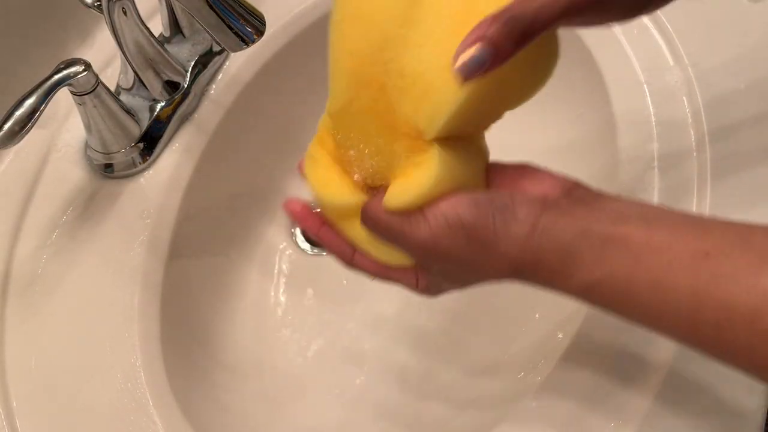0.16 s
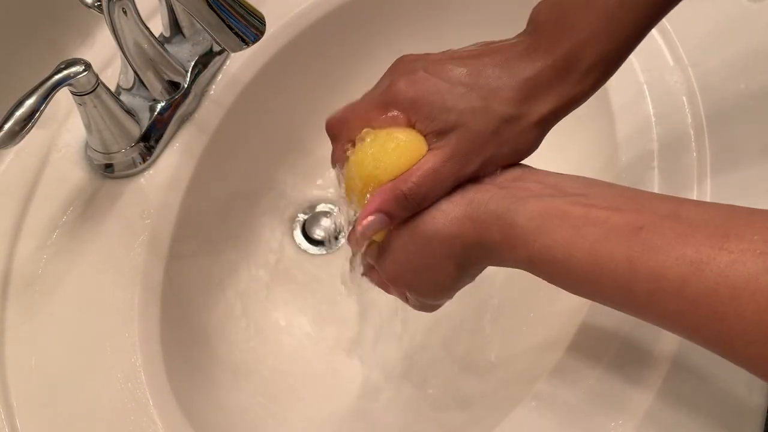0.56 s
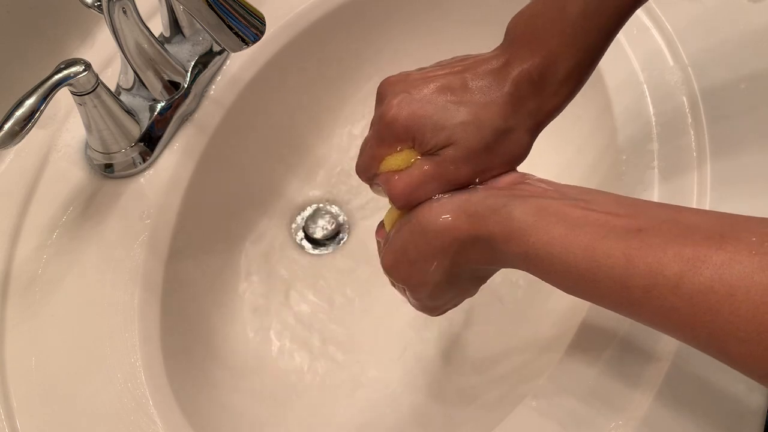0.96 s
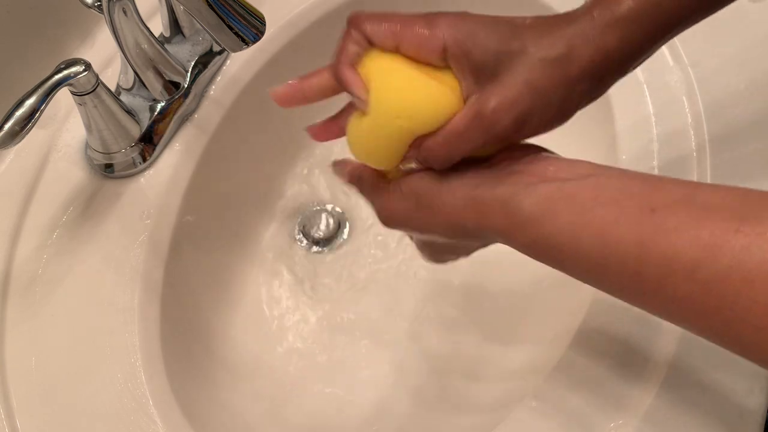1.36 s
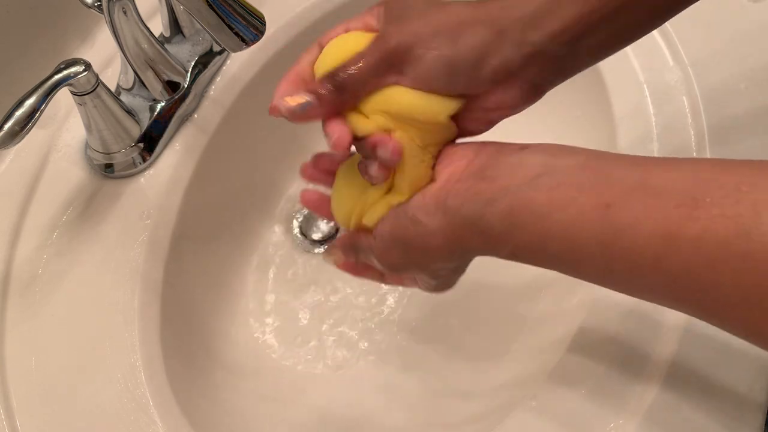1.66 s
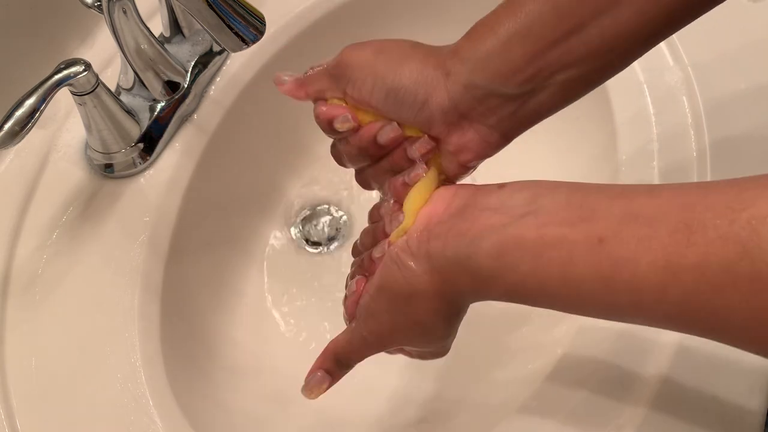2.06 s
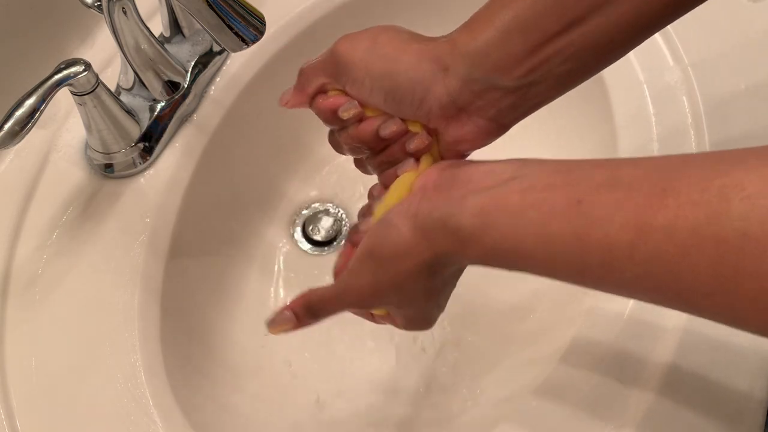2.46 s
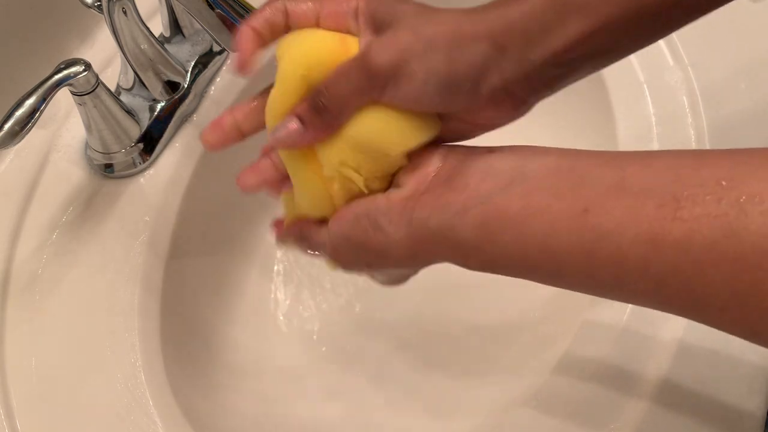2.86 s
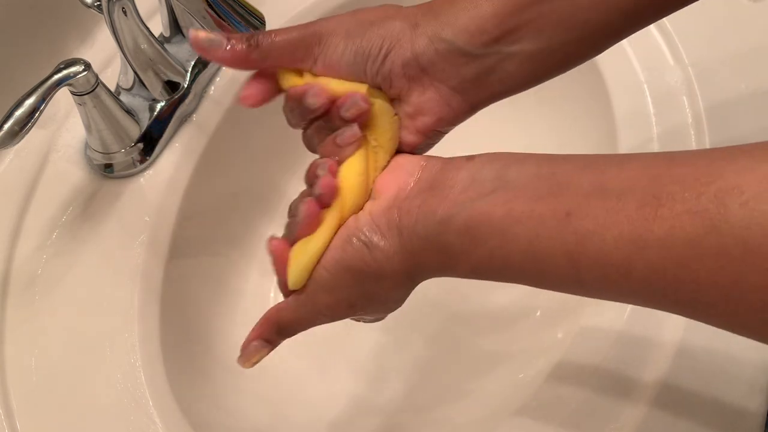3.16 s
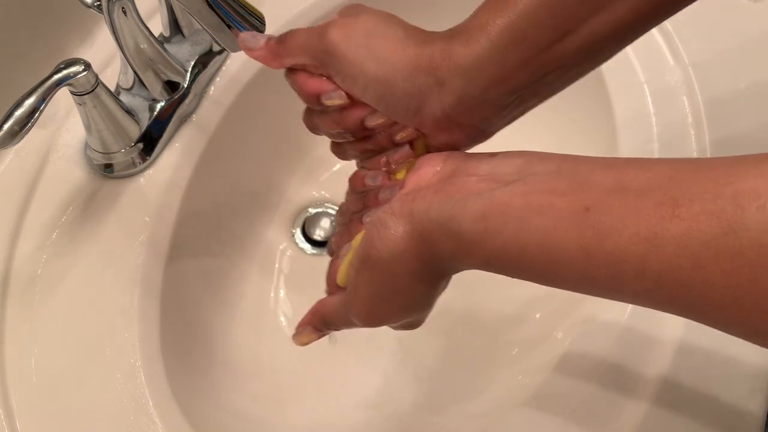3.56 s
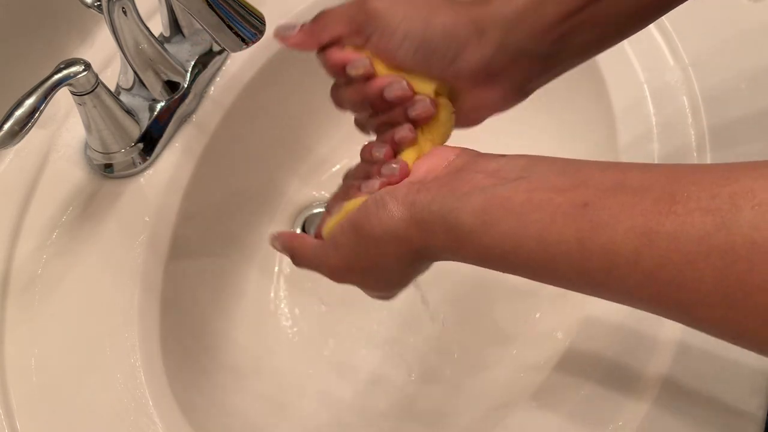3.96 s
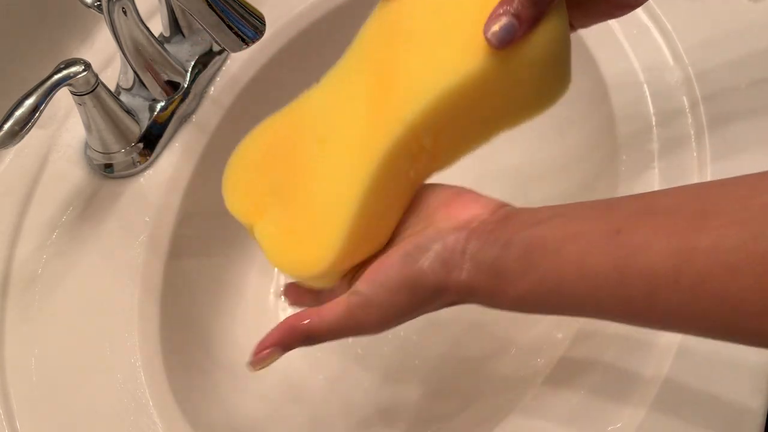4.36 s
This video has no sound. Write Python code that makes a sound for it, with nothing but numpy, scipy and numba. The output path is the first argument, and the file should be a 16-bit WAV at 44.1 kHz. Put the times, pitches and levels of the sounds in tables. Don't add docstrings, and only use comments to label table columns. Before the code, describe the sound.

A soaked foam sponge is wrung hard over a bathroom basin, fizzing, crackling and squelching wetly, then fading to sparse faint crackles.

```python
import sys
import numpy as np
from scipy import signal
from scipy.fft import rfft, irfft, next_fast_len
from scipy.io import wavfile
from scipy.ndimage import uniform_filter1d
from numba import njit

SR = 44100
rng = np.random.default_rng(int(sys.argv[2]) if len(sys.argv) > 2 else 0)


def wav_record(signal):
    frames = np.transpose(np.atleast_2d(signal))
    bounded = np.clip(frames, -1, 1)
    quanta = np.round(bounded * 32767).astype(np.int16)
    wavfile.write(sys.argv[1], SR, quanta)


def gain_from_db(level_db):
    decades = np.asarray(level_db, float) / 20
    return 10 ** decades


N = 198758
T = np.arange(N) / SR
M = next_fast_len(N + SR // 2, True)
HZ = np.fft.rfftfreq(M, 1 / SR)


def unit(x):
    return x / np.sqrt(np.mean(x ** 2))


def shape(table):
    hz, db = np.transpose(table)
    return gain_from_db(np.interp(np.log(HZ + 1), np.log(hz + 1), db))


def colour(x, gain):
    return irfft(rfft(x, M) * gain, M)[..., :N]


def walk(rate):
    hold = int(SR / rate)
    levels = np.repeat(rng.standard_normal(N // hold + 1), hold)
    return 1.074 * uniform_filter1d(levels, hold)[:N]


def swells(idle_db, s, db, rise_s, fall_s, idle_hz=1, hz=1, order=1):
    now = T[::32, None]
    before = (s - now) / np.maximum(rise_s, .002)
    after = (now - s) / np.maximum(fall_s, .002)
    power = gain_from_db(2 * (db - 20 * np.maximum(before, after) ** order))
    idle = gain_from_db(2 * np.interp(now[:, 0], T, idle_db))
    total = idle + power.sum(axis=1)
    pitch = (idle * idle_hz + (power * hz).sum(axis=1)) / total
    return np.interp(T, now[:, 0], 10 * np.log10(total)), np.interp(T, now[:, 0], pitch)


@njit
def bubbles(n, start, step, t60, size, glide, rise):
    out = np.zeros(n)
    for k in range(len(start)):
        turn, level, phase = step[k], size[k], 0.
        fall = np.exp(-np.log(1000.) / t60[k])
        for i in range(start[k], min(n, start[k] + int(t60[k]))):
            out[i] += level * np.sin(phase) * min(1., phase / (2 * np.pi * rise))
            phase += turn
            level *= fall
            turn *= 1 + glide / t60[k]
    return out


def ring(s, hz, t60_s, size, glide, rise):
    step = 2 * np.pi * np.clip(hz, 50, 12000) / SR
    return bubbles(N, (s * SR).astype(np.int64), step, np.maximum(t60_s * SR, 8.), size, glide, max(rise, .05))


def swarm(count, centre_hz, octaves, cycles, scatter_db, table, patch_s, patch_octaves, size):
    s, strength = rng.random((count, 2)).T
    hz = np.interp(s * T[-1], T, centre_hz) * 2 ** (octaves * rng.standard_normal(count))
    late, loud = rng.random((2, count, size))
    s = (s[:, None] * T[-1] + patch_s * late ** 1.5).ravel()
    hz = (hz[:, None] * 2 ** (patch_octaves * rng.standard_normal((count, size)))).ravel()
    rarity = np.log(1.01 - strength)[:, None] + 2.0 * np.log(1.01 - loud)
    db = -scatter_db * rarity - 8 * late
    crowd = ring(s, hz, cycles / hz, gain_from_db(db.ravel()), glide=0.32, rise=0.28)
    mean = np.sqrt(uniform_filter1d(np.abs(rfft(crowd, M)) ** 2, size=4000))
    return unit(colour(crowd, shape(table) / mean))


# time of peak in s, level in dB, pitch in Hz,
# rise in s and fall in s, both over 20 dB.
SPURTS = [(0.029, -50.5, 4920, 0.012, 0.085), (.33, -93.5, 5140, 0.31, 0.21),
          (0.424, -52, 6120, 0.026, 0.85), (0.603, -39, 4515, 0.093, 0.34), (0.791, -39, 4600, 0.23, 0.43),
          (.96, -42.5, 4060, 0.32, 0.17), (1.09, -50, 4400, 0.18, 0.29), (1.268, -43.5, 4410, 0.13, 0.067),
          (1.38, -58.5, 3760, 0.004, 0.3), (1.56, -63.5, 4630, 0.28, 0.65),
          (1.71, -57.5, 3640, 0.024, 0.26), (1.82, -59, 3660, 0.19, 0.049), (2.109, -61, 4080, 0.26, 0.21),
          (2.476, -57, 6030, 0.025, 0.16), (2.609, -58.5, 5490, 0.069, 0.27),
          (2.701, -62, 4070, 0.12, 0.12), (2.82, -67, 6470, 0.053, 0.22), (3.138, -54.5, 4040, 0.18, 0.068),
          (3.34, -57.5, 4500, 0.086, 0.38), (3.389, -53.5, 6540, 0.055, 0.3),
          (3.503, -44.5, 6780, 0.12, 0.087), (3.72, -69.5, 4900, 0.11, 0.089),
          (3.792, -53.5, 6300, 0.0079, 0.032), (3.884, -58, 4700, 0.023, 0.15),
          (4.201, -61, 4760, 0.2, 0.26), (4.329, -59, 5260, 0.36, 0.12)]
# frequency in Hz, level in dB per Hz.
SPRAY = [(1500, -54), (2300, -48), (2650, -15.5), (3100, -3.5), (4500, -2), (5300, 0.5), (7000, -2.5),
         (8300, -12.5), (9300, -22), (10500, -32), (11500, -45), (13000, -97)]


def spray(flow_db):
    s, db, hz, rise, fall = np.transpose(SPURTS)
    level_db, pitch_hz = swells(flow_db - 10.5, s, db, rise, fall, 4500, hz)
    return [gain_from_db(level_db - 7.0 + 1.56 * walk(45))
            * swarm(count=1000, centre_hz=pitch_hz, octaves=0.4, cycles=18.6, scatter_db=2.0, table=SPRAY,
                    patch_s=.035, patch_octaves=0.069, size=7) for _ in "lr"]


# time of peak in s, level in dB, pitch in Hz, rise in s and fall in s,
# both over 20 dB.
SQUISHES = [(0.42, -75, 1086, 0.076, 0.21), (0.681, -54, 2066, 0.17, 0.41), (.93, -46.5, 1814, 0.16, 0.19),
            (1.09, -59.5, 1780, 0.12, 0.68), (1.293, -70.5, 1910, 0.044, 0.032),
            (1.704, -52, 1355, 0.012, 0.16), (1.785, -55, 1175, 0.16, 0.12), (2.08, -69, 1850, 0.44, 0.15),
            (2.468, -55, 1260, 0.025, 0.053), (2.721, -69, 1335, 0.35, 0.6),
            (3.122, -56.5, 1585, 0.15, 0.22), (3.23, -72.5, 1820, 0.068, 0.53), (3.42, -66, 1410, 1, 0.33),
            (4.2, -79, 1224, 0.27, 0.26)]
# frequency in Hz, level in dB per Hz.
SQUELCH = [(150, -74.5), (300, -18.5), (450, 0), (800, -7.5), (1200, -2.5), (1800, -2.5), (2500, -8),
           (3000, -0.5), (4200, -36.5), (7000, -106)]


def squelch(flow_db):
    s, db, hz, rise, fall = np.transpose(SQUISHES)
    level_db, pitch_hz = swells(flow_db - 8.5, s, db, rise, fall, 1510, hz)
    crowd = swarm(count=2200, centre_hz=pitch_hz, octaves=0.446, cycles=22.3, scatter_db=0.9, table=SQUELCH,
                  patch_s=.045, patch_octaves=0.086, size=5)
    return gain_from_db(level_db - 6.0 + 1.33 * walk(32)) * crowd


# frequency in Hz, gain in dB.
MICROPHONE = [(2300, 0), (3000, 9.5), (7000, 6), (8300, 4), (9500, -11.5), (11500, -57), (13000, -75)]


def bursts(table, gain_db, glide, crack, octaves, cycles, rise, count):
    s, db, hz, t60, pure = np.transpose(table)
    detune = octaves * rng.standard_normal((len(s), count)).T
    late = rng.random((len(s), count)).T ** 2
    size, pure = gain_from_db(db + gain_db), np.clip(pure, 0, 1)
    rough = crack * size * np.sqrt(1.05 - pure ** 2)
    out = ring(s, hz, 1.24 * t60, pure * size, glide, rise)
    for f, d in zip(detune, late):
        near_hz = hz * 2 ** (f * (1 - 1.3 * d))
        out = out + ring(s + 0.66 * d * t60, near_hz, cycles / hz, rough * gain_from_db(-15 * d), glide, rise)
    return colour(out, shape(MICROPHONE))


# time in s, peak in dB, pitch in Hz, purity 0-1.
POPS = [(0.0268, -40, 4580, 0.7), (0.455, -39, 6400, 0.8), (0.4893, -32.5, 6130, 0.1),
        (0.517, -47.5, 5240, .2), (.5576, -50, 3650, 0.9), (0.5927, -40, 3120, 0.9),
        (0.671, -16.5, 4990, 0.17), (.735, -30.5, 5160, 0), (0.7919, -36.5, 4470, .7),
        (0.816, -29, 4030, 0.1), (0.982, -26, 4500, 0.28), (1.0138, -27, 4910, 0.3),
        (1.0777, -30.5, 3210, 0.24), (1.1073, -46, 5100, 0.6), (1.263, -44, 3030, 0.8),
        (1.38, -36.5, 4530, 0.13), (1.477, -44.5, 5600, 0), (1.554, -61, 4590, 0.4),
        (1.577, -50.5, 6820, 1), (1.6206, -49, 4740, 0.84), (1.696, -51, 5330, .24),
        (1.712, -51, 3020, 0.3), (1.889, -53.5, 2650, 1), (2.0334, -49, 4720, 0.1),
        (2.0972, -51, 3300, 0.83), (2.366, -53.5, 3570, 0.57), (2.432, -59.5, 3170, 0.55),
        (2.489, -38.5, 6030, 0.35), (2.534, -44.5, 5030, 0.5), (2.592, -50, 5030, 0.4),
            (2.616, -50, 4940, 0), (2.6703, -37.5, 7200, 0.09), (2.689, -46, 3450, 0.9),
            (2.801, -40.5, 6040, 0.24), (2.996, -60.5, 5550, 0.3), (3.034, -53, 4070, 0.3),
            (3.0897, -57, 3330, 0.2), (3.2061, -50.5, 3030, 0.15), (3.498, -49, 5840, 0.8),
            (3.7045, -52, 4250, 0.07), (3.789, -52, 5380, 0.87), (3.874, -45, 4550, 0.25),
            (3.898, -40, 5120, 0.33), (4.1517, -44.5, 5200, 0.3), (4.178, -46.5, 3915, 0.6),
            (4.2347, -38, 5200, 0.2), (4.2712, -48, 5200, 0.3), (4.3125, -34, 5760, 0.1)]


def pore_pops():
    pops = [(s, db, hz, .019, pure) for s, db, hz, pure in POPS]
    return bursts(pops, -3.0, glide=0.065, crack=0.76, octaves=0.32, cycles=13.8, rise=2.54, count=12)


# time in s, peak in dB, pitch in Hz.
TICKS = [(0.0154, -50, 6900), (0.027, -31, 4604), (0.418, -53, 5480), (0.4563, -37, 6100),
         (0.5181, -35.5, 5120), (0.5973, -30, 4520), (0.6716, -22, 5170), (0.7366, -31, 4800),
         (0.8165, -38, 4230), (0.8382, -29, 4000), (0.853, -31.5, 4290), (0.9814, -35, 4770),
         (1.0785, -32.5, 4700), (1.1097, -36.5, 5300), (1.2653, -40, 5750), (1.3781, -39.5, 4700),
         (1.5547, -51, 4500.0), (1.5814, -64, 6600), (1.6235, -48, 4890), (1.9166, -55, 6400),
         (2.0338, -50.5, 4800), (2.0979, -45.5, 3350), (2.3659, -58, 3620), (2.4892, -48, 5900),
         (2.5369, -45, 4770), (2.5921, -45, 5300), (2.6227, -47, 5100), (2.6688, -48.5, 7250),
         (2.6892, -40.5, 3520), (2.768, -59, 3400), (2.8017, -52, 6350), (2.9962, -56, 5450),
         (3.0347, -53, 4070), (3.218, -53, 3050.0), (3.44, -40.5, 8280), (3.451, -44, 7530),
         (3.469, -45.5, 8160), (3.5, -41, 7070), (3.7031, -56.0, 4760.0), (3.7892, -54, 5800),
         (3.7987, -55, 5800), (3.8744, -48, 4300), (3.896, -43.0, 4320), (3.955, -47.5, 5430),
         (4.119, -58, 6400), (4.1803, -40.5, 4780), (4.23, -45, 5230.0), (4.2405, -54, 4870),
         (4.2712, -37, 5350), (4.3128, -34.5, 5570), (4.3575, -52, 5500), (4.3696, -44, 5270),
         (4.428, -62, 5500.0)]
# time in s, peak in dB, pitch in Hz.
AFTER_TICKS = [(0.0339, -33, 4790), (0.0383, -34, 4960), (0.674, -32, 5550), (.679, -28, 4980),
               (.681, -36, 7500), (0.683, -28, 5400), (.8255, -30, 5020), (1.016, -41, 4730),
               (1.5, -54, 6340), (1.262, -45, 7200), (3.7895, -57, 7800), (1.112, -42, 7300),
               (2.097, -56, 4640), (2.4885, -65, 7600), (2.534, -52, 3380), (2.689, -46, 4600),
               (3.041, -54, 6100), (3.358, -57, 8500), (3.37, -58, 8900), (3.418, -57, 8650),
               (3.484, -53, 7960), (4.202, -58, 6000), (4.197, -50, 3950), (4.241, -55, 6960),
               (4.32, -39, 6900), (4.428, -59, 7540), (4.33, -52, 6100)]


def ticks():
    s, db, hz = np.transpose(list(TICKS) + list(AFTER_TICKS))
    out = np.zeros(N)
    for ratio, side_db in ((.74, -7), (1, 2), (1.3, -9)):
        for lag_s, echo_db in ((0, 0), (0.0064, -9)):
            blip_hz = np.minimum(ratio * hz, 9300)
            out += ring(s + lag_s + .0003, blip_hz, 31 / hz, gain_from_db(db + side_db + echo_db), 0., 5.17)
    return out


# start in s, level in dB, pitch in Hz, length in s, slide in octaves.
WHISTLES = [(0.02, -52, 6660, .04, 0.058), (0.446, -46, 5190, .015, 0.086),
            (0.453, -40, 6310, 0.058, -0.043), (0.485, -46, 4770, .05, -0.073),
            (0.557, -51, 3560, 0.041, -0.025), (.59, -42, 3120, .03, 0.054),
            (0.703, -38.5, 5480, 0.039, 0.06), (0.83, -36.5, 4490, .03, 0.026),
            (0.927, -41.5, 3280, .03, 0.057), (0.977, -43.5, 3100, 0.044, 0), (0.781, -40, 4680, .1, 0.028),
            (0.874, -40.5, 7100, .05, -0.06), (0.733, -40, 6360, .04, -0.098),
            (1.012, -46, 4700, .035, 0.0022), (1.052, -56.5, 1153, 0.061, 0.08),
            (1.06, -49, 1850, 0.052, -0.02), (1.259, -50.5, 2970, 0.059, 0.014),
            (1.375, -55.5, 5080, .025, -0.11), (1.839, -72, 1235, .025, 0.027),
            (1.933, -68, 2620, .055, -0.042), (2.127, -65.5, 2500, .05, -0.029),
            (1.7, -55.5, 1180, .045, 0.12), (1.758, -54.5, 1223, .055, 0.014),
            (1.805, -54.5, 3130, 0.044, 0.041), (2.532, -63, 3540, 0.017, 0.036),
            (2.631, -62.5, 1100, .12, 0.1), (2.683, -62.5, 4640, .015, 0),
            (2.763, -59, 3340, 0.026, -0.071), (2.911, -61, 4260, 0.034, 0.021),
            (3.089, -47, 1062, 0.042, -0.38), (3.13, -56, 780, 0.035, -0.088),
            (3.132, -56.5, 1140, .03, .2), (3.097, -58, 3020, .06, -0.15), (3.052, -58, 1170, .03, -.1),
            (3.01, -69, 3400, .03, 0.023), (3.325, -57, 4140, .05, 0.023), (3.312, -53.5, 5100, 0.073, 0),
            (3.363, -51, 7950, 0.055, -0.042), (3.416, -55.5, 3160, 0.037, 0.042),
            (3.495, -43.5, 6100, 0.077, 0.015), (3.732, -64, 2920, 0.038, 0.094),
            (3.786, -57, 6840, 0.029, -0.038), (3.871, -55.5, 3400, .045, -0.018),
            (3.923, -53.5, 4630, 0.038, 0.22)]


def whistles(count):
    s, db, hz, length, slide = np.transpose(WHISTLES)[..., None]
    along = (np.arange(count) + rng.random((len(WHISTLES), count))) / count
    detune, size = rng.standard_normal((2, len(WHISTLES), count))
    hz = (hz * 2 ** (slide * along + 0.036 * detune)).ravel()
    level = gain_from_db(db - 5.7 * along + 2.5 * size).ravel()
    return ring((s + length * along).ravel(), hz, 0.015 + 30 / hz, level, glide=0.013, rise=1.9)


# time in s, peak in dB, pitch in Hz, ring t60 in s,
# purity 0-1.
POCKETS = [(0.592, -37.5, 1916, 0.04, 0.36), (0.666, -42.5, 2165, 0.028, 0.7), (0.792, -41, 1413, 0.038, 1),
           (0.838, -34.5, 2230, 0.026, 0.22), (0.931, -38, 1824, 0.048, 0.7), (1.055, -33, 1820, 0.079, 0),
           (1.295, -55, 1903, 0.054, 0.5), (1.553, -57.5, 1730, 0.033, 0.73), (1.655, -63, 597, 0.12, 0.96),
           (1.699, -49, 1710, 0.055, 0.56), (1.778, -52.5, 1252, 0.083, 0.9),
           (1.989, -47, 1770, 0.056, 0.11), (2.034, -51.5, 1900, 0.033, 0.6),
           (2.326, -50.5, 1926, 0.036, 0.94), (2.3655, -49.5, 1955, 0.05, 0.94),
           (2.463, -48, 1171, 0.048, 0.77), (2.535, -48, 1754, 0.027, 0.9),
           (2.688, -59.5, 1133, 0.069, 0.8), (2.754, -52, 1890, 0.049, 0.82),
           (2.86, -45.5, 1700, 0.04, 0.6), (3.0575, -45.5, 1606, 0.03, 0.98),
           (3.092, -47, 1010, 0.019, 0.7), (3.206, -57, 2280, 0.04, 0.7), (3.354, -55.5, 1000, 0.067, 0.4),
           (.866, -49, 822, 0.11, 0.75), (.985, -45, 1579, 0.1, 0.76), (1.085, -45, 1480, 0.043, 0.9),
           (3.076, -54, 1194, 0.076, 0.54), (1.65, -62, 1880, .05, 0.86), (1.72, -50.5, 705, 0.058, 0.7),
           (1.919, -72, 1920, 0.027, 0.7), (2.753, -57, 1150, 0.064, 0.75)]


def pockets():
    return bursts(POCKETS, -0.052, glide=0.075, crack=0.61, octaves=0.35, cycles=20.0, rise=2.1, count=5)


# time in s, peak in dB, pitch in Hz, ring t60 in s, purity 0-1.
SLAPS = [(0.558, -70, 214, 0.056, 1), (0.868, -85, 223, 0.042, 1), (1.043, -47.5, 288, 0.082, 0.96),
         (1.658, -62.5, 331, 0.069, 0.84), (1.701, -43.5, 516, 0.05, 0.3), (1.798, -53, 318, 0.11, 0.84),
         (2.326, -47, 410, 0.06, 0.1), (2.465, -41, 314, 0.06, 0.84), (2.86, -46.5, 294, 0.07, 0.88),
         (.7, -56, 138, .2, .8), (.88, -46.5, 142.4, 0.3, 1), (2.67, -55, 177, .12, 0.5),
         (3.06, -53.5, 440, 0.1, .3), (3.11, -52, 513, 0.062, 0.38), (3.21, -57, 650, .08, 0.5),
         (3.25, -54.5, 556, .08, 0.3), (3.44, -54.5, 133, 0.13, 0.7), (2.04, -54.5, 171, .1, 0.5),
         (3.123, -56, 220.7, 0.23, 0.68), (3.49, -51.5, 134.2, 0.39, 0.89), (3.63, -54.5, 434, 0.038, 0.76)]


def slaps():
    return bursts(SLAPS, -0.81, glide=0.024, crack=0.91, octaves=0.39, cycles=7.7, rise=0.67, count=4)


# time in s, level in dB.
FLOW = [(0, -69), (.3, -83), (.43, -66.5), (.6, -58), (.93, -62.5), (1.1, -55), (1.29, -61), (1.6, -67),
        (1.7, -59), (2.25, -62.5), (2.45, -62.5), (2.9, -61.5), (3.2, -69.5), (3.4, -73), (3.51, -67),
        (3.69, -92.5), (4.3, -76), (4.5, -96)]


def flow():
    return np.interp(T, *np.transpose(FLOW))


# frequency in Hz, left gain in dB.
LEFT_PORT = [(6500, 0.07), (8500, -3), (10000, -2.5), (11500, -2)]
# frequency in Hz, side minus mid in dB.
WIDTH = [(60, -13.5), (100, -5), (180, -12.5), (320, 0), (550, -0.5), (960, 3), (1680, -1.5), (2930, 0),
         (5100, -1), (8880, 0.5)]


def spread(mid, side):
    side = colour(side, shape(WIDTH))
    port = shape(LEFT_PORT)
    return colour(np.array([mid + side, mid - side]), np.array([port, 1 / port]))


def resonance(hz, width_hz):
    return 1 / (1 + ((HZ - hz) / (width_hz / 2)) ** 2)


# time of peak in s, level in dB, rise and fall in s over 20 dB.
SHOVES = [(.125, -57, 0.08), (0.522, -54.5, 0.16), (.65, -47.5, 0.13), (.8, -56.5, 0.11),
          (0.929, -42.5, 0.14), (1.06, -49, 0.1), (1.32, -53, 0.05), (1.48, -63.5, 0.6), (1.86, -58, 0.04),
          (2.079, -60, 0.06), (2.29, -50, 0.08), (2.46, -54.5, 0.08), (2.58, -53.5, 0.05), (2.8, -57, 0.21),
          (2.99, -65, 0.2), (3.11, -61, 0.02), (3.24, -64.5, 0.17), (3.37, -75, 0.5), (3.5, -56, 0.04),
          (3.6, -58, 0.05), (3.97, -67, 0.14), (4.27, -64, 0.17)]
# frequency in Hz, width in Hz, level in dB.
THUMP = [(140.4, 34.3, 5.5), (97, 25, -1), (223, 72, -11), (318, 25, -11), (447, 41, -19), (35.3, 23, -2)]


def basin(flow_db):
    s, db, length = np.transpose(SHOVES)
    drone_db = swells(flow_db - 2.5, s, db, length, length, order=2)[0]
    modes = sum(gain_from_db(db) * resonance(hz, width) for hz, width, db in THUMP)

    def shake():
        drone = gain_from_db(2.2 * walk(14)) * np.sin(2 * np.pi * np.cumsum(61 + 2.616 * walk(12)) / SR)
        thump = colour(rng.standard_normal(N), modes)
        return gain_from_db(drone_db) * unit(drone) + gain_from_db(flow_db + 3.7 * walk(25.236)) * unit(thump)

    mid = shake()
    return spread(mid, 0.81 * colour(mid, complex(0, 1)) + .45 * shake())


def room(x, t60_s, wet_db, turn):
    tail = rng.standard_normal((2, N)) * np.exp(-np.log(1000) * T / t60_s) * (T > .002)
    tail *= gain_from_db(wet_db) / np.sqrt(np.sum(tail ** 2, axis=1, keepdims=True))
    direct = np.array([[1], [complex(0, turn)]])
    paths = (rfft(tail, M) + direct) / np.sqrt(1 + gain_from_db(2 * wet_db))
    return spread(*colour(x, paths))


def hiss(table, db):
    return spread(*(gain_from_db(db) * unit(colour(rng.standard_normal(N), shape(table))) for _ in "ms"))


# frequency in Hz, level in dB per Hz.
HUSH = [(25, -3), (62, -0.5), (95, -1), (140, -18), (220, -15), (330, -20), (500, -17), (800, -24),
        (2300, -29), (3000, -32), (5000, -24.5), (9000, -35), (11000, -54.5)]


def hush():
    return hiss(HUSH, -73.5)


def scene():
    flow_db = flow()
    near_hand, far_hand = spray(flow_db)
    snaps = ticks()
    near = near_hand + squelch(flow_db) + pockets() + slaps() + whistles(count=8)
    far = far_hand + snaps + pore_pops()
    tiled = room(near, t60_s=0.14, wet_db=-0.28, turn=1) + room(far, t60_s=0.19, wet_db=1.0, turn=-1.15)
    close_snaps = gain_from_db(np.array([[-1.5], [-3.5]])) * snaps
    return tiled + close_snaps + basin(flow_db) + hush()


# from in s, to in s, depth in dB.
SHUT = [
    (1.122, 1.261, -37),
    (3.164, 3.208, -16.5),
]


def suppressed(dry):
    shut_db = sum(db * ((T > a) & (T < b)) for a, b, db in SHUT)
    gain = uniform_filter1d(gain_from_db(shut_db), size=400)
    return (1 - gain) * colour(dry - hush(), HZ < 7900)


# frequency in Hz, level in dB per Hz.
AIR = [(8000, -37.5), (9500, -4), (12800, 0.5), (13200, -19), (13900, -17), (14300, -7), (15200, 2),
       (15700, -32)]


def high_hiss(dry):
    treble = uniform_filter1d(np.abs(np.diff(dry[0], prepend=0)), size=3000)
    duck = 1 / (1 + (treble / gain_from_db(-57)) ** 3)
    return duck * hiss(AIR, -93)


def low_pass(x):
    return signal.sosfilt(signal.butter(12, 15700, fs=SR, output="sos"), x)


def record(dry):
    heard = dry - suppressed(dry) + high_hiss(dry)
    return low_pass(heard)


dry = scene()
out = record(dry)
wav_record(out)
```